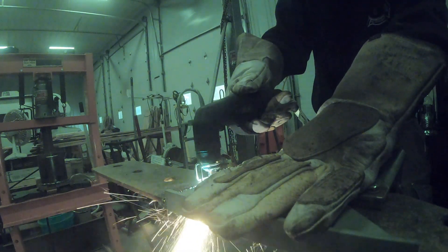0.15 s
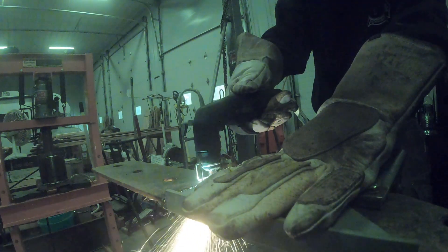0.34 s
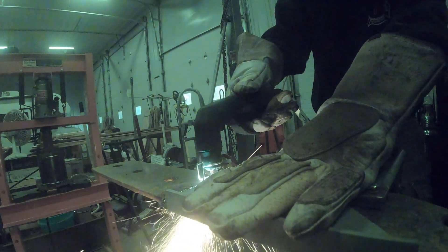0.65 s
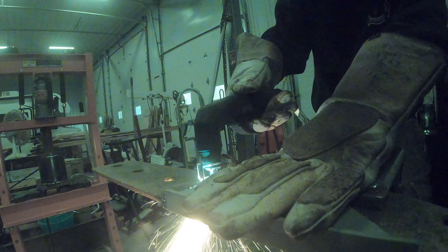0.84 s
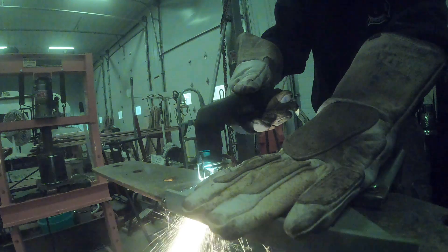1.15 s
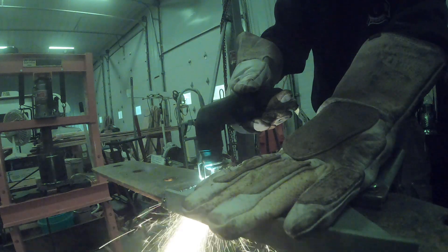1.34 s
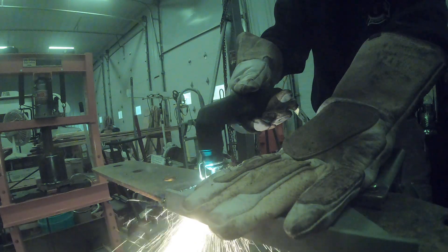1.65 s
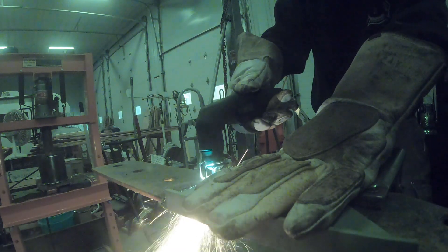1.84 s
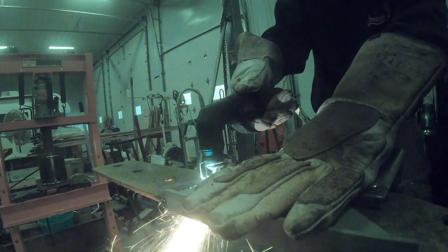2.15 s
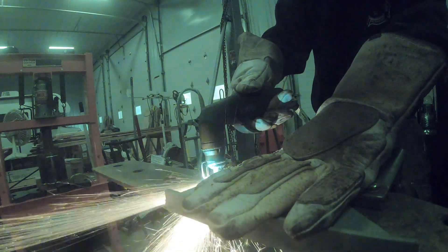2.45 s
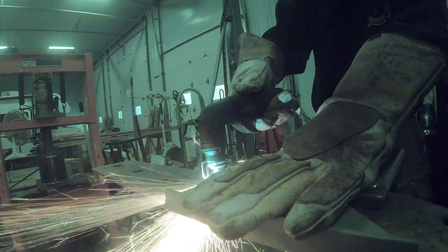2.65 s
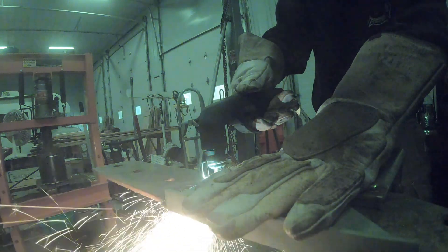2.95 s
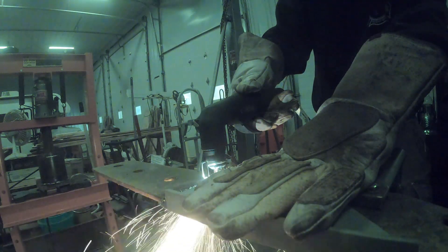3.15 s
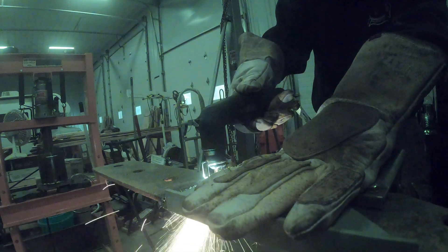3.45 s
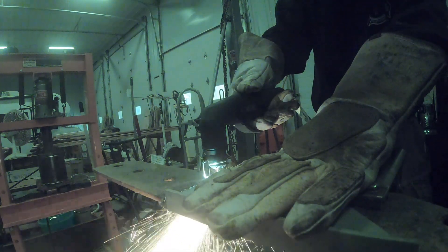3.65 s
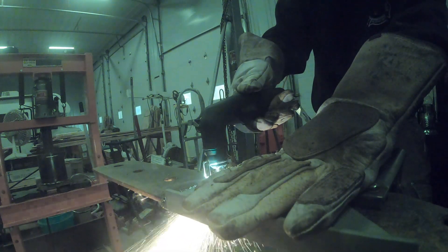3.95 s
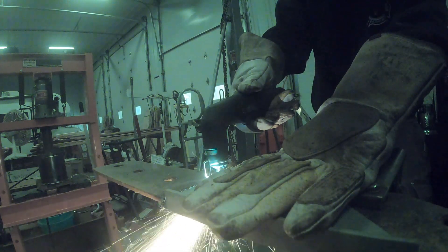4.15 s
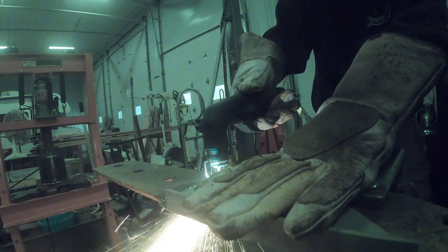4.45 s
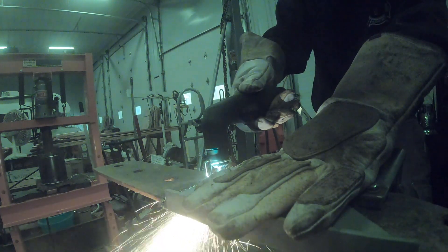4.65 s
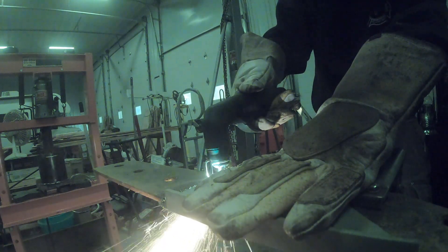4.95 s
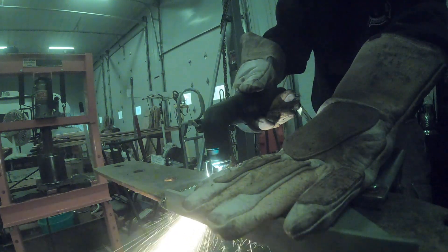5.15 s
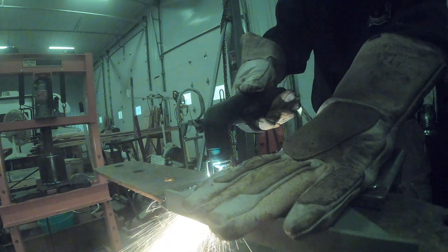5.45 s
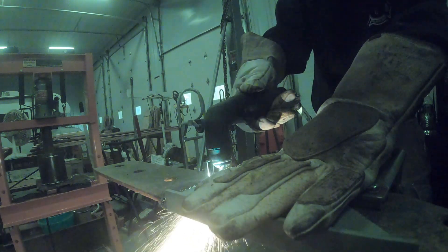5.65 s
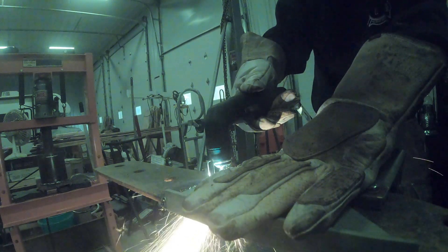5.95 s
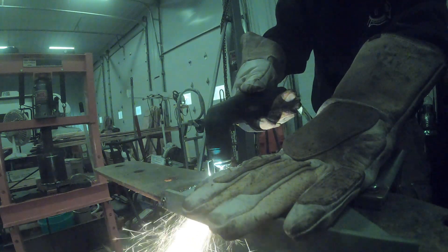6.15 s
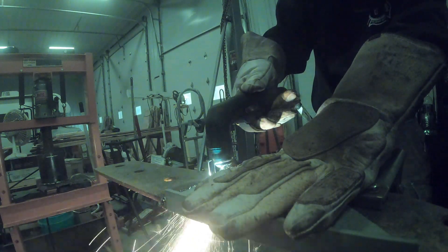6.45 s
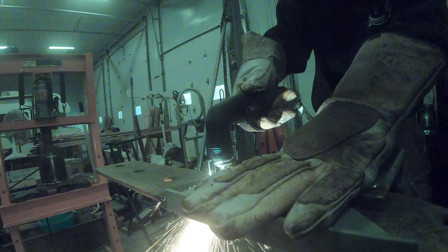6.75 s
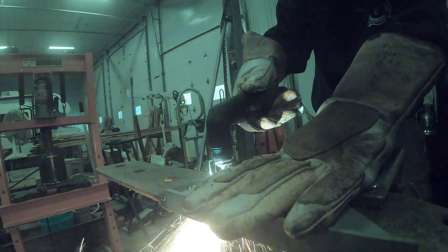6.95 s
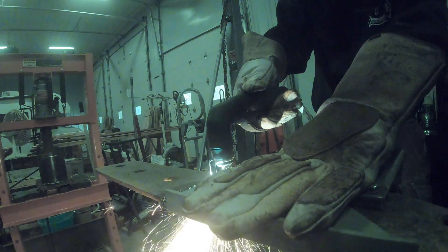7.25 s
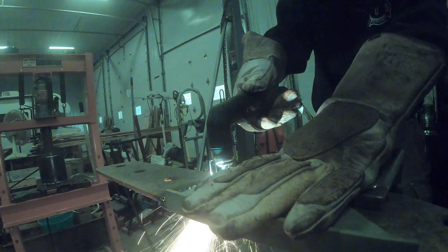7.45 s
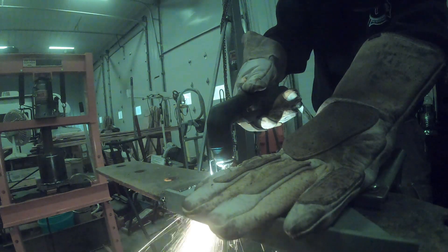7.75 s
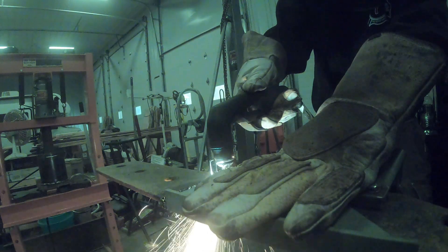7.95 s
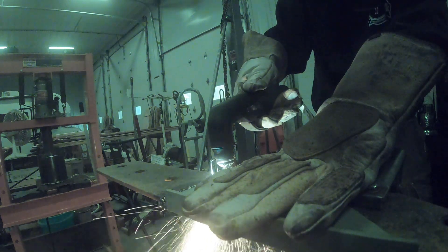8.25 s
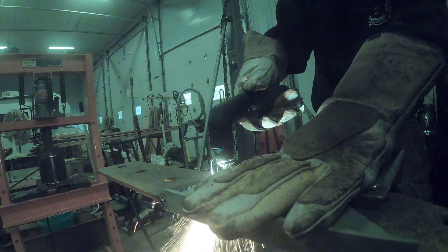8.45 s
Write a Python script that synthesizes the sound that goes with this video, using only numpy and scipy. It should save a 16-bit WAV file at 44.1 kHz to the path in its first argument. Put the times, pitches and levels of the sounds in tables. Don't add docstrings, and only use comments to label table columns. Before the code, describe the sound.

A steady, loud jet of air and arc roars through thick plate from start to finish, strongest in the middle and upper range, slightly fluttering. Soft lumps of molten slag puff underneath, growing busier later. Early on a hollow, low whoosh sinks and rises again as the jet fails to pierce. Close stereo camera microphones, hardly any room echo, occasional dull bass puffs on the right.

```python
import sys
import numpy as np
from scipy import signal
from scipy.fft import rfft, irfft, next_fast_len
from scipy.io import wavfile
from scipy.ndimage import uniform_filter1d, map_coordinates

SR = 44100
rng = np.random.default_rng(int(sys.argv[2]) if len(sys.argv) > 2 else 0)


def persist_wave(psi):
    counts = np.round(np.clip(psi, -1, 1) * 32767).astype(np.int16)
    wavfile.write(sys.argv[1], SR, np.atleast_2d(counts).T)


def decibels_to_gain(level_db):
    exponent = np.asarray(level_db, float) / 20
    return 10 ** exponent


N = 378800


def unit(x):
    return x / np.sqrt(np.mean(np.mean(x, axis=0) ** 2) + 1e-20)


def along(rows, hz):
    f, *columns = np.transpose(rows)
    return np.array([np.interp(np.log(hz + 1), np.log(f + 1), column) for column in columns])


def curves(rows):
    s, *columns = np.transpose(rows)
    return [np.interp(np.arange(N) / SR, s, column) for column in columns]


def wobble(rate):
    knots = rng.standard_normal(int(N * rate / SR) + 4)
    return map_coordinates(knots, [np.arange(N) * rate / SR])


def filtered(x, response):
    m = next_fast_len(N + SR // 4)
    return irfft(rfft(x, m) * response(np.fft.rfftfreq(m, 1 / SR)), m)[..., :N]


def below(hz, edge):
    return 1 / np.sqrt(1 + (hz / edge) ** 8)


def above(hz, edge):
    return np.sqrt(1 - below(hz, edge) ** 2)


def turbulence(patchy_db, shape=lambda hz, s: 1):
    hz, s, z = signal.stft(rng.standard_normal((2, N)), SR, nperseg=1024)
    patches = uniform_filter1d(rng.standard_normal(z.shape[1:]), size=14, axis=0)
    patches = uniform_filter1d(patches, size=5, axis=1)
    z = z * decibels_to_gain(patchy_db * patches / patches.std()) * shape(hz[:, None], s)
    return signal.istft(z, SR, nperseg=1024)[1][:, :N]


# f/Hz, left-right likeness [0-1], left
STEREO_IMAGE = [(60, .97, -.1), (600, .94, .3), (950, .97, .5), (1050, .8, .5), (1170, .95, .6),
                (1330, .87, .9), (1480, .1, .2), (1700, .85, -.9), (1950, .95, -.4), (2200, .78, -.2),
                (2450, .93, .1), (2900, .25, -.7), (3700, .97, 1.9), (4250, .65, 2.5),
                (4500, .42, 1.6), (4850, .6, -1.9), (5300, .9, -3.14), (5750, .1, -2.5), (6500, .86, -2.1),
              (6900, .4, -2.2), (7450, .62, -.5), (7800, .35, -2.6), (8120, .99, -3.6), (8500, .2, -4.2),
              (8850, .68, -3.9), (9800, .25, -4), (11000, .5, -3.2), (12000, .25, -6.2)]


def stereo_image(hz):
    return along(STEREO_IMAGE, hz)


# f/Hz, left level/dB, right level/dB
PORT_COLOUR = [(92, -17.5, -16.5), (202, -12.5, -10.5), (515, -16.5, -12), (1002, -0.5, 1.4),
               (1500, -4.5, -6), (2500, -2.7, -3.4), (3700, .2, 2.3), (4400, -14.3, -7.1),
               (6000, -4.3, -11.4), (8100, -4.1, 0), (10800, -18, -16), (12760, -26.5, -26),
               (13400, -33, -30.5), (15100, -38, -40)]
# f/Hz, width/Hz, left level/dB, right level/dB
RESONANCES = [(440, 40, 2.5, 0.9), (490, 50, 5.7, 4.2), (530, 50, 2.6, 2.2), (610, 60, 1.7, -2.0),
              (700, 70, 3.9, 2.5), (820, 60, -3.9, -5.3), (880, 60, -1.4, -3.3), (940, 70, 3.1, 2.3),
              (1000, 40, -1.7, -0.6), (1040, 50, -5.7, -7.4), (1090, 50, 0.2, -3.7), (1160, 50, 2.2, 3.6),
              (1210, 50, -3.7, -1.2), (1270, 60, -2.3, -6.4), (1420, 40, -7.7, 1.6),
              (1480, 70, -2.3, -3.7), (1580, 50, -5.9, -0.9), (1890, 190, 5.0, 6.3), (2060, 60, 3.2, 3.3),
              (2210, 100, -1.1, -1.6), (2350, 50, -2.3, -0.5), (2460, 170, 4.8, 6.9),
              (2930, 40, 0.6, -4.4), (3090, 310, 3.8, -1.9), (3290, 50, -1.2, -3.5), (3510, 80, 0.1, -3.0),
              (4390, 200, 3.6, -1.9), (4710, 210, 1.9, 4.6), (5100, 110, -1.9, -3.7),
                 (5290, 240, 5.6, 1.0), (5670, 260, -4.4, 0.6), (6080, 610, -10.8, 7.7),
                 (6590, 460, 3.0, 2.6), (6950, 310, -1.7, -4.5), (7210, 160, -4.3, 5.5),
                 (7650, 770, -3.6, -10.3), (8110, 240, 9.4, 1.3), (8470, 130, 0.2, 3.1),
                 (8600, 130, 3.6, -2.8), (8880, 130, 3.7, 5.5), (10040, 450, 2.1, -2.8),
                 (10480, 160, -2.3, -2.1), (11060, 500, -2.2, -5.0), (12040, 840, -3.1, 5.9),
              (175, 25, 3.5, 3.5),
    (3190, 50, 1.5, 1.5),
    (4730, 80, 4, 1.5),
    (6210, 100, 1, 3.5),
    (7350, 100, 1, 2.5),
    (8160, 90, 0, 3),
    (13950, 450, 5, 5),
]


def port_response(hz):
    colour_db = along(PORT_COLOUR, hz)
    for centre, width, *db in RESONANCES:
        colour_db = colour_db + np.array(db)[:, None] / (1 + (2 * (hz - centre) / width) ** 2)
    lead = stereo_image(hz)[1]
    delays = rng.uniform(.003, .03, (10, 2, 1))
    signs = rng.choice([-1, 1], (10, 2, 1))
    reach = decibels_to_gain(-23) / np.sqrt(1 + (2500 / (hz + 1)) ** 4)
    echoes = 1 + reach * np.sum(signs * np.exp(-2j * np.pi * hz * delays), axis=0)
    return decibels_to_gain(colour_db) * echoes * np.exp(.5j * np.array([lead, -lead]))


def heard(pair, band, ports):
    def turn(hz):
        return np.arccos(np.clip(stereo_image(hz)[0], 0, 1)) / 2

    mid, side = filtered(pair, lambda hz: band(hz) * [np.cos(turn(hz)), np.sin(turn(hz))])
    return unit(filtered(np.array([mid + side, mid - side]), lambda hz: ports))


# t/s, level/dB, length/s
HOT_PUFFS = [(.52, -54, .05), (.95, -54, .08), (1.5, -47, .06), (2.38, -47, .05), (2.97, -54, 0.037),
             (3.8, -56, .04), (4.7, -64, .08), (5.39, -51, .03), (5.95, -57, .06), (6.22, -54, .04),
             (6.75, -49, .06), (7.26, -52, .04)]


def draught():
    t = np.arange(N) / SR
    puffs = sum(decibels_to_gain(db) * np.exp(-((t - s) / length) ** 2) for s, db, length in HOT_PUFFS)
    push = filtered(rng.standard_normal(N), lambda hz: below(hz, 98))
    return np.array([-.15, .95])[:, None] * puffs * unit(push[None])


# t/s, roar level/dB
SLAG_LOAD = [(0, -43), (.7, -41.5), (1.6, -41.5), (2.0, -42.5), (3.3, -41), (4.0, -39.5), (4.5, -39.5),
             (5.2, -41.5), (5.9, -37), (6.5, -40), (7.0, -39.5), (7.7, -40.5), (8.59, -39)]
# t/s, level over the roar/dB
SLAG_LUMPS = [(.6, 0.5), (1.05, 0), (1.57, 5.5), (2.21, 2.5), (3.61, 1), (4.07, 4), (4.18, 2.5),
              (4.85, 4.5), (5.03, 4.5), (5.31, 3), (5.51, 2), (5.93, 4), (6.2, 1), (6.75, 6), (6.95, 4.5),
              (7.06, 2), (7.26, 5), (7.44, 6), (7.91, 3), (8.14, 1), (8.33, 2.5), (8.47, 2)]


def load_db():
    t = np.arange(N) / SR
    lump_s = 0.042
    swells = sum(db * np.exp(-((t - s) / lump_s) ** 2) for s, db in SLAG_LUMPS)
    return curves(SLAG_LOAD)[0] + swells


CROSSOVERS = (650, 1500, 4200)


def slag(ports, load):
    roar = heard(turbulence(patchy_db=0.45), lambda hz: below(hz, CROSSOVERS[0]), ports)
    return decibels_to_gain(load + 1.4 * wobble(16) + .7 * wobble(7)) * roar


# t/s, resonance f/Hz, force level/dB
BLOWN_POCKET = [
    (2.32, 480, -38),
    (2.4, 380, -32.5),
    (2.47, 270, -40),
    (2.54, 179, -31.5),
    (2.62, 190, -33.5),
    (2.72, 230, -37),
    (2.8, 300, -31.5),
    (2.87, 380, -36),
    (3.03, 470, -34),
]


def blowing():
    t = np.arange(N) / SR
    attack_s, release_s = 0.023, .05
    rise = (t - BLOWN_POCKET[0][0]) / attack_s
    fall = (BLOWN_POCKET[-1][0] - t) / release_s
    return np.clip(np.minimum(rise, fall), 0, 1)


def blow_back(ports):
    s, centre, _ = np.transpose(BLOWN_POCKET)

    def resonance(hz, t):
        octaves = np.log2((hz + 1) / np.interp(t, s, centre))
        peak = 1 / (1 + (octaves / 0.8) ** 2)
        return peak / (1 + (np.maximum(octaves, 0) / 1.2) ** 2)

    howl = heard(turbulence(patchy_db=-0.5, shape=resonance), lambda hz: below(hz, 900), ports)
    steady = howl / np.sqrt(np.abs(uniform_filter1d(np.mean(howl ** 2, axis=0), size=3000)))
    force_db = curves(BLOWN_POCKET)[1] + .8 * wobble(16)
    return decibels_to_gain(force_db) * blowing() * steady


# t/s, fizz level/dB
TORCH_LIFT = [(0, -28.3), (.3, -28.8), (.8, -28), (1.5, -27.6), (2.0, -28), (2.35, -27.5), (2.6, -29),
              (3.1, -28), (3.6, -27), (4.0, -27.5), (4.5, -27), (5.2, -27), (5.6, -28), (6.1, -27.5),
              (6.5, -28.5), (7.0, -28), (7.8, -29), (8.59, -28.5)]


def jet(ports, load):
    fizz_db, = curves(TORCH_LIFT)
    lift = fizz_db - fizz_db.mean()
    blow, wander = blowing(), wobble(11)
    rush_db = -23.5 - 0.57 * lift - 0.45 * wander - 0.1 * blow
    drone_db = -31.5 + 0.29 * (load - load.mean()) + 2.5 * blow + .6 * wobble(8)
    slope_db = 1.1 * lift - 1.5 * blow

    def tilt(hz, s):
        octaves = np.clip(np.log2((hz + 1) / 2700), -1, 1)
        return decibels_to_gain(np.interp(s * SR, np.arange(N), slope_db) * octaves)

    low, middle, high = CROSSOVERS
    drone = heard(turbulence(patchy_db=0.64), lambda hz: above(hz, low) * below(hz, middle), ports)
    rush = heard(turbulence(patchy_db=0.2, shape=tilt), lambda hz: above(hz, middle) * below(hz, high), ports)
    fizz = heard(turbulence(patchy_db=1.0), lambda hz: above(hz, high), ports)
    flutter_db = 0.26 * wander + 0.28 * wobble(30)
    return decibels_to_gain(drone_db) * drone + decibels_to_gain(rush_db) * rush + decibels_to_gain(fizz_db + 0.4 + flutter_db) * fizz


def scene():
    ports = port_response(np.fft.rfftfreq(next_fast_len(N + SR // 4), 1 / SR))
    load = load_db()
    return decibels_to_gain(6.5) * draught() + slag(ports, load) + blow_back(ports) + jet(ports, load)


def top_cut(x):
    return signal.sosfilt(signal.butter(12, 15300, fs=SR, output="sos"), x)


def record(dry):
    cut = filtered(dry, lambda hz: 1 / np.sqrt(1 + (70 / (hz + 1)) ** 6))
    return top_cut(cut * decibels_to_gain(.3))


dry = scene()
out = record(dry)
persist_wave(out)
```